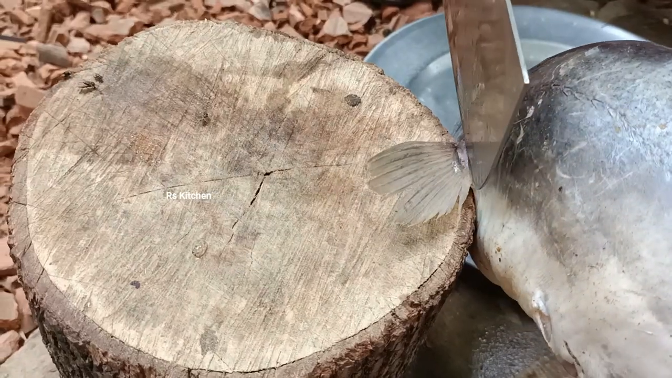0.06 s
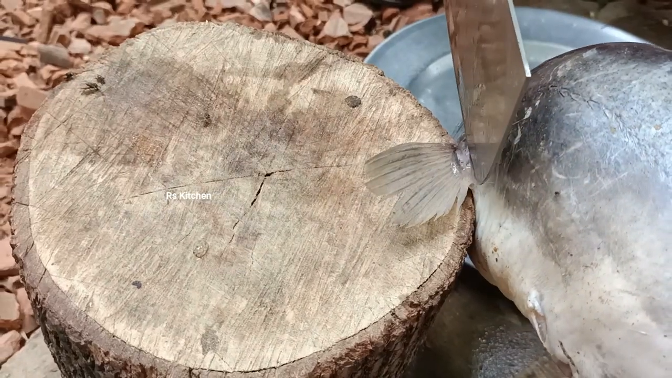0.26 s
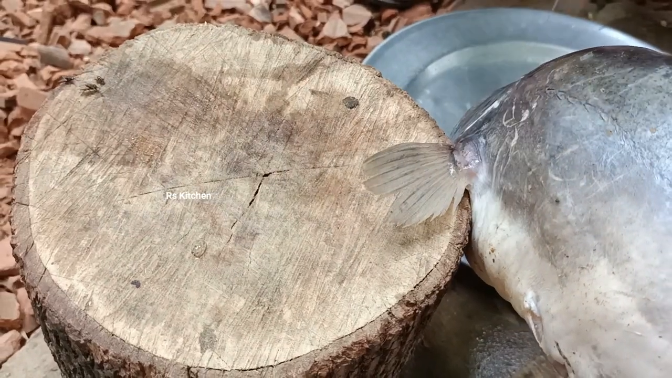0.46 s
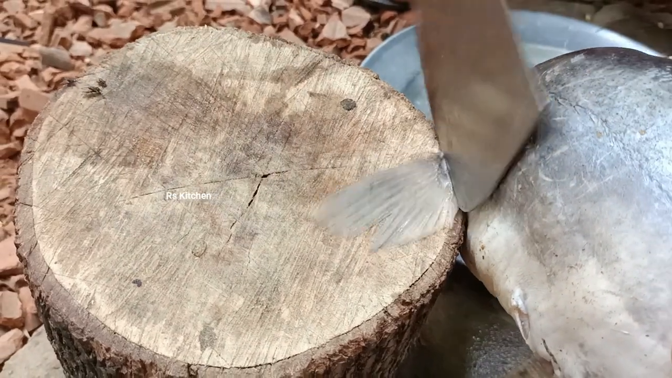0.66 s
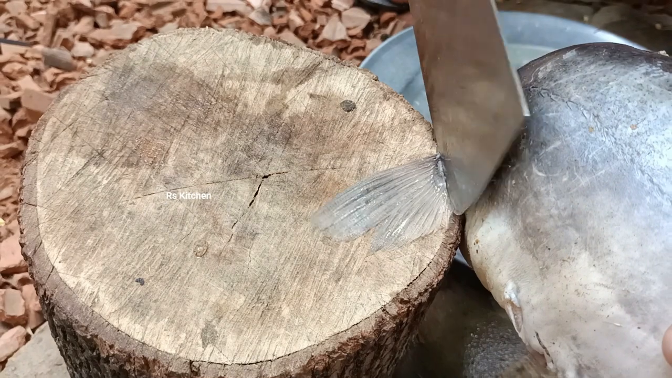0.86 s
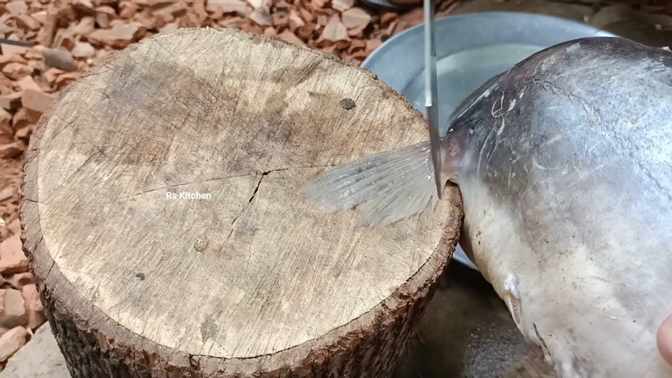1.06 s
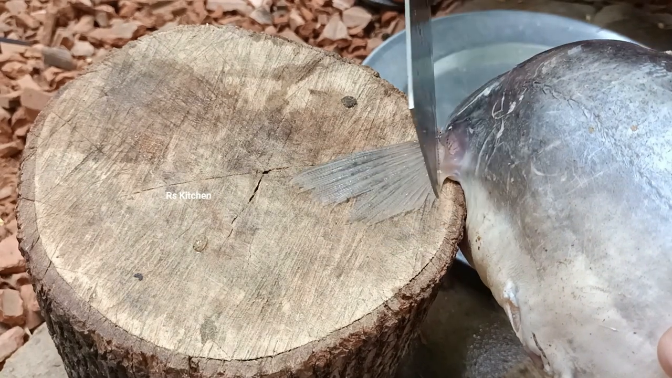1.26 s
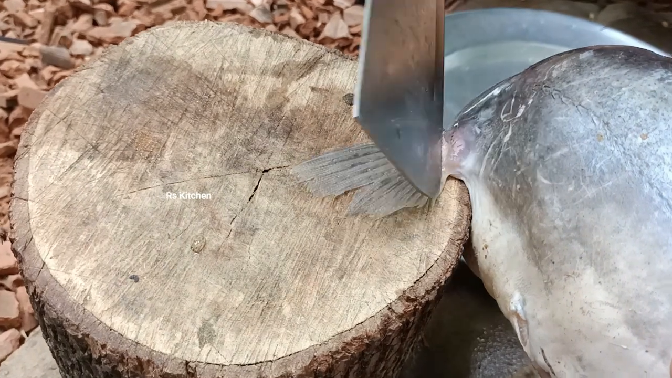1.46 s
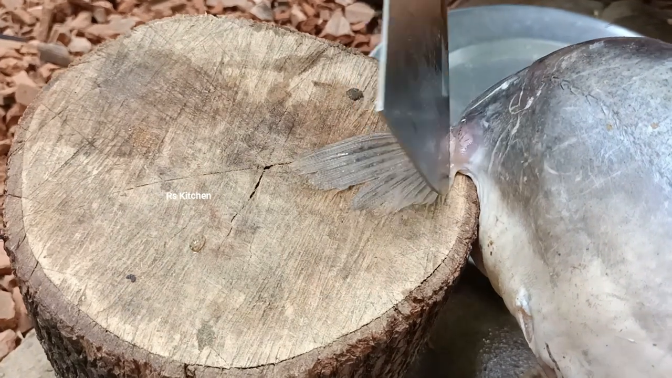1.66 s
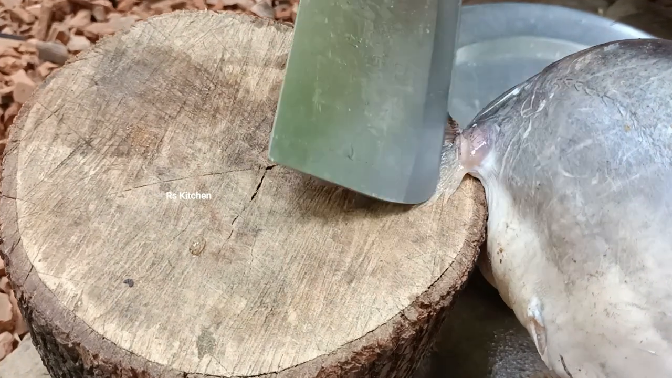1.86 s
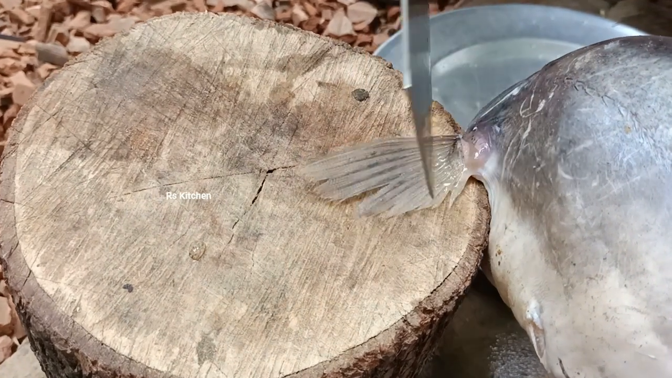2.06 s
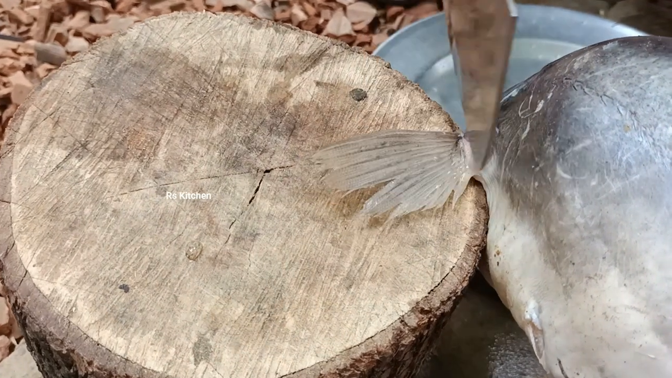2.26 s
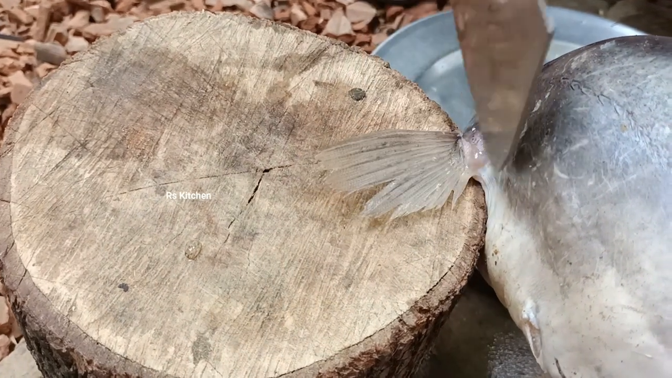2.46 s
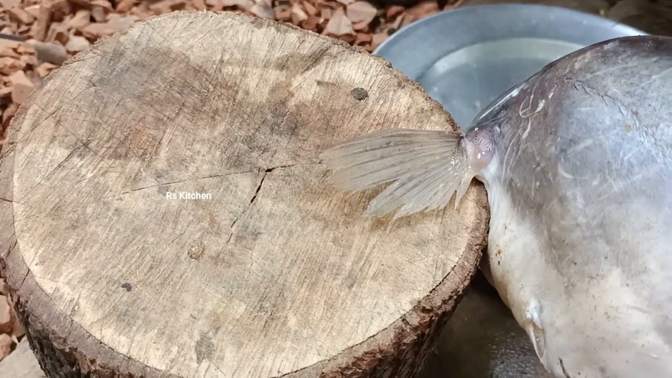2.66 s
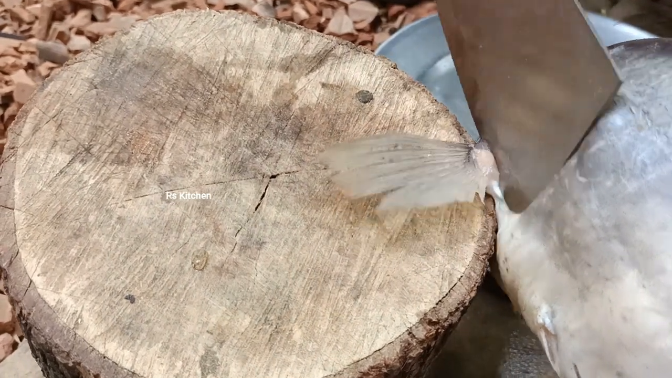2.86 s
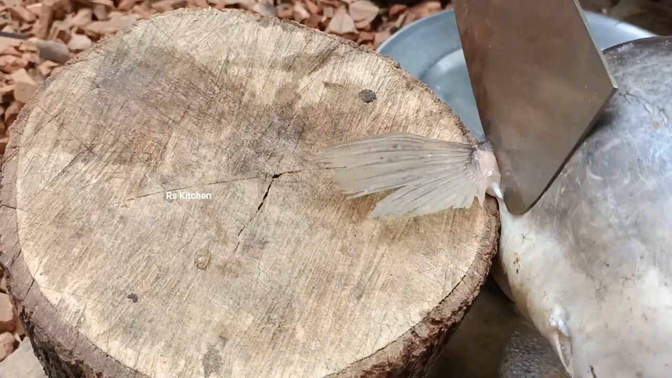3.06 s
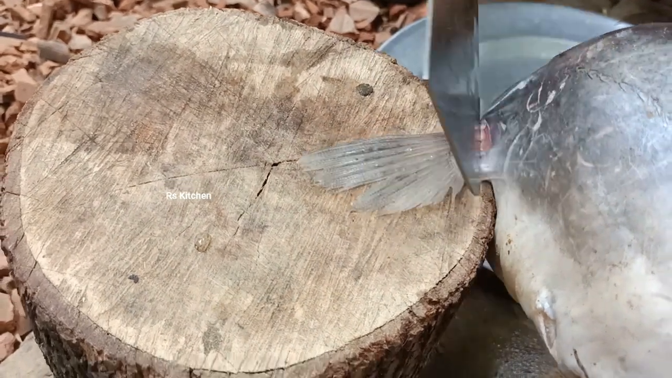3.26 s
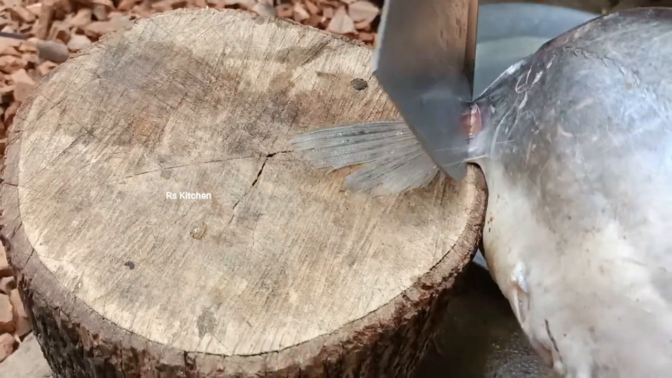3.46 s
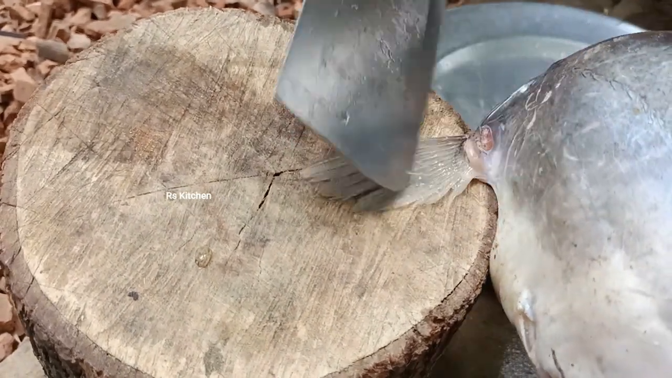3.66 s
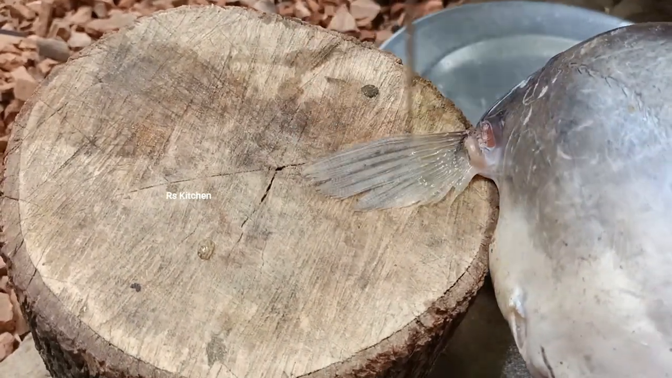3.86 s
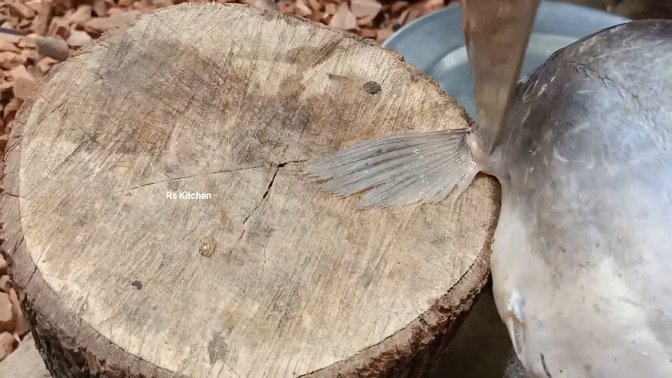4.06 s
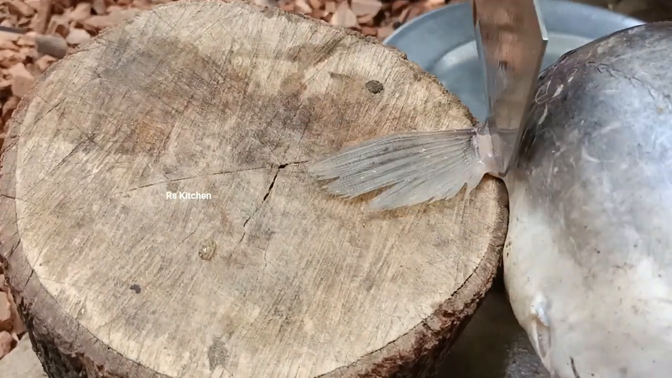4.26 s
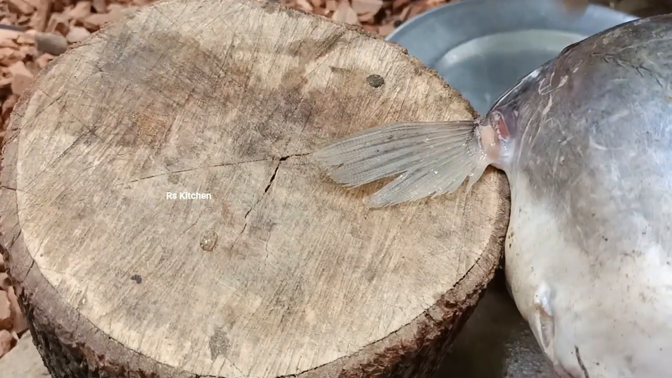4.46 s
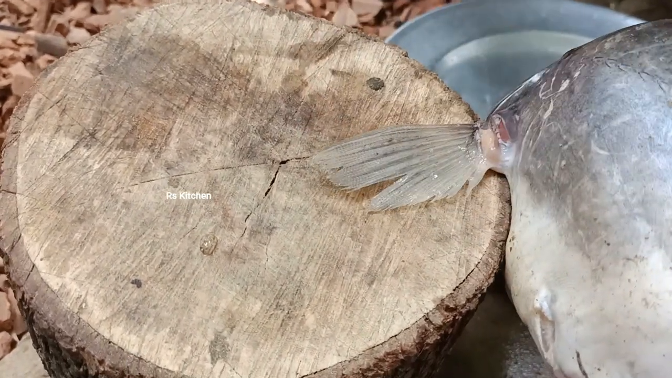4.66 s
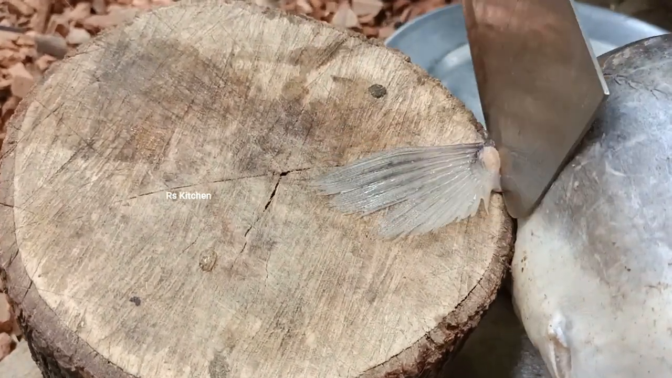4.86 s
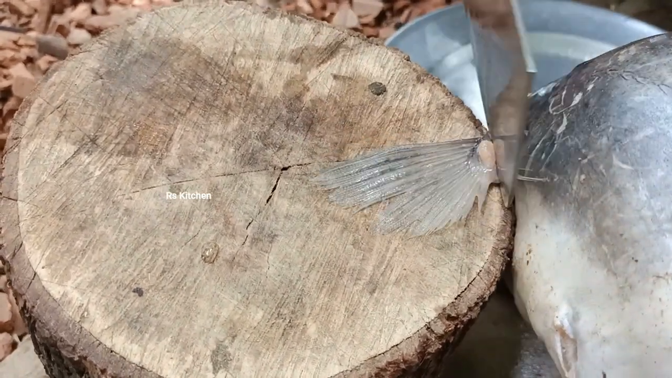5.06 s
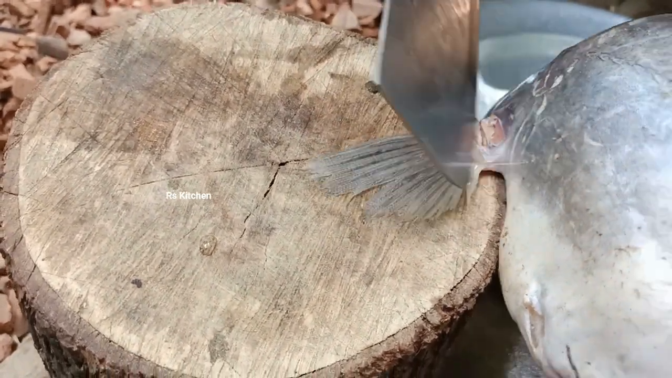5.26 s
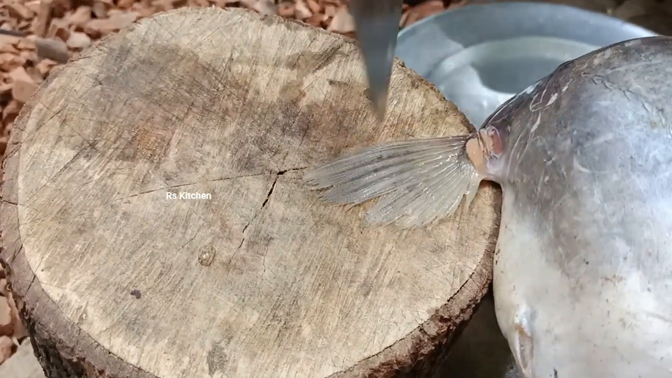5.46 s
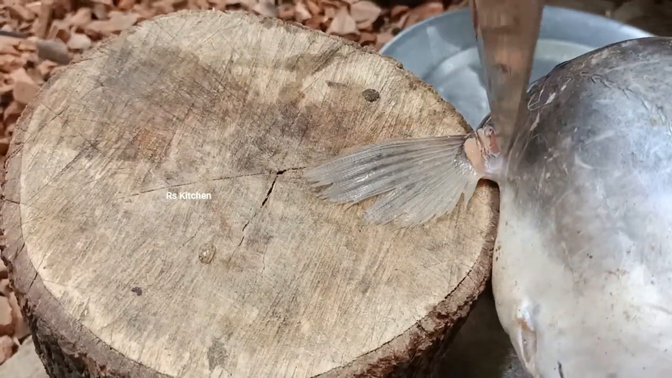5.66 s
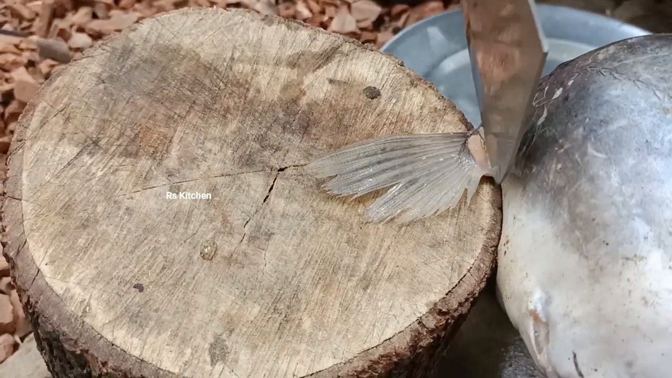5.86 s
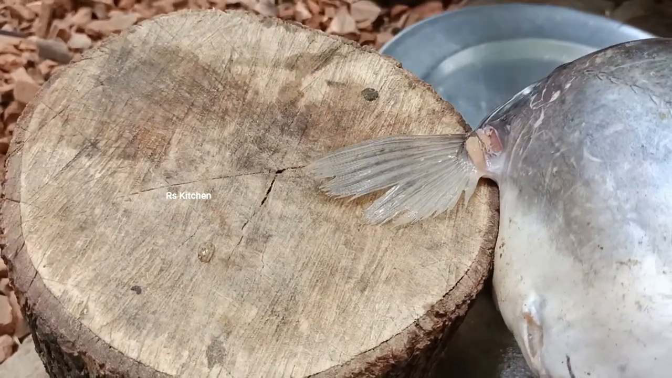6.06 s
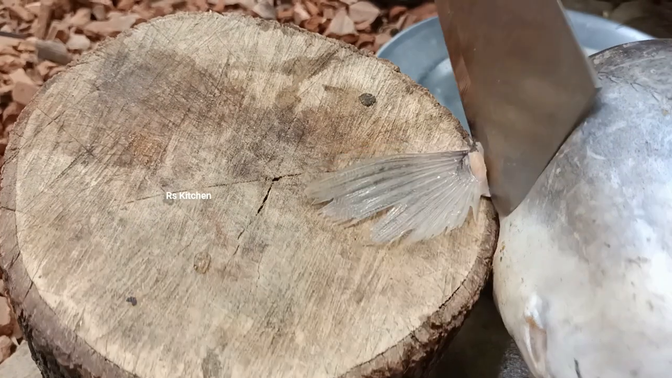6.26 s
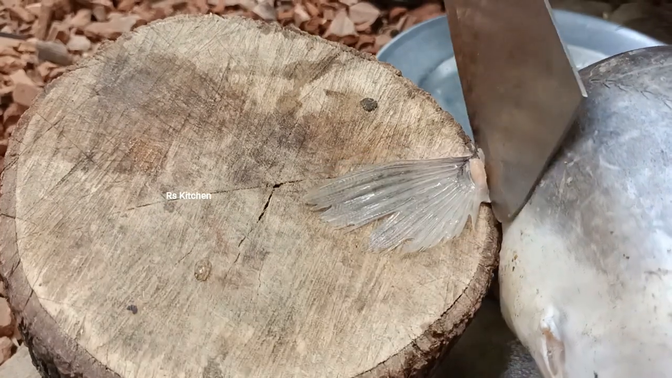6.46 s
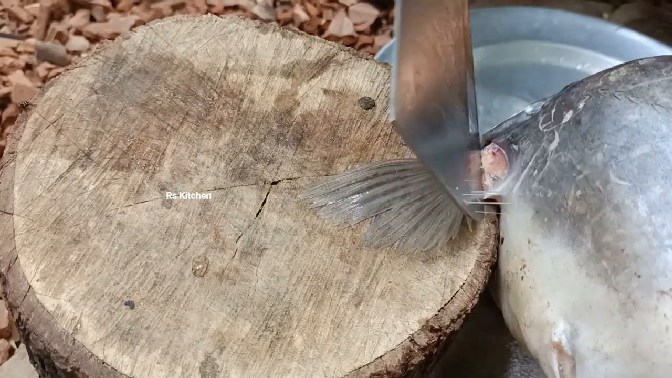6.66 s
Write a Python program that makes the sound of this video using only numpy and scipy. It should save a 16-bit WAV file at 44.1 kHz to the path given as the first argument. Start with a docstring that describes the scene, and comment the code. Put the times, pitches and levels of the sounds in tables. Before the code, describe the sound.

Close up outdoors, a cleaver chops four times, about two seconds apart at first and then a little quicker. Each blow is a bright crack of fin bone with a brief crunch and a short, damped thud of the wooden block. Between blows the blade ticks, rings briefly and scrapes on the wood. Behind it are faint birds, soft wind on the stereo microphone and a low hush.

```python
"""A cleaver chops four times through the fin of a large fish on a tree-stump block, outdoors, close by.
Each chop is shaped noise for the cracking bones, decaying sines for the block and a slow push of air.
Between chops the blade ticks and rings (noise burst, decaying sines) and scrapes (uneven noise).
Behind lie gliding bird notes, low-frequency wind noise on the microphone and a hush of filtered noise."""
import sys
import numpy as np
from scipy import signal
from scipy.fft import rfft, irfft
from scipy.io import wavfile
from scipy.ndimage import uniform_filter1d

SR = 44100
rng = np.random.default_rng(int(sys.argv[2]) if len(sys.argv) > 2 else 0)


def put_to_file(sound):
    """Save the sound as 16-bit audio at rate SR, in the file named by the first command-line argument."""
    columns = np.atleast_2d(sound).T  # one column per channel
    safe = np.clip(columns, -1, 1)
    whole_steps = np.round(safe * 32767)
    wavfile.write(sys.argv[1], SR, whole_steps.astype(np.int16))


N = 296352

# chops: (time [s], crack level [dB], crack length [s], crack colour 1 [Hz], crack colour 2 [Hz],
#   crack body [dB], thud level [dB], thud pitch [factor], thud length [factor],
#   thud tilt [dB/octave], air push [dB], pan [dB L-R])
CHOPS = [(0.7875, -11.5, 0.0032, 4460, 8220, -4.5, -16.5, 1.034, 0.53, 3.7, -12.5, -1),
         (2.9197, -14.5, 0.00442, 4330, 8940, 4, -13, 1.076, 0.64, 3.1, -48, -2),
         (4.8038, -11, 0.00234, 5600, 8530, 3, -14.5, 0.997, 0.82, 2.1, -48, 0.49),
         (6.318, -12, 0.0041, 3360, 8750, -1, -15.5, 0.947, 0.6, 3.2, -44, -1.9)]
# fin bones breaking: (frequency [Hz], relative density [dB per Hz])
CRACK_SPECTRUM = [(30, -45), (120, -21), (450, 1.5), (900, 2.5), (1700, -0.5), (3300, 2), (5500, 2.5),
                  (8500, 2), (9800, -3.5), (12000, 3.5), (15000, -6.5), (16300, 0)]
# block modes with the fish on it, before each blow's factors: (frequency [Hz], level [dB], ring time [s])
BLOCK_MODES = [(133, -21, 0.072), (178.2, -1, 0.054), (223, -15, 0.089), (376, -7, 0.04), (451, -6, 0.023),
               (542, -20, 0.053), (673, -29.5, 0.08)]


def chops(peak_db=7, slice_db=-21, slice_s=0.011):
    """The edge cracks through the bones, then thuds into the block and pushes air at the microphone."""
    out, t = np.zeros((2, N)), np.arange(SR // 4) / SR
    # the block is too small to send out deep bass
    radiation = signal.butter(3, 85, "high", fs=SR, output="sos")
    for (s, crack_db, crack_s, low_hz, high_hz, body_db,
         thud_db, pitch, hold, tilt_db, push_db, pan_db) in CHOPS:

        def bone_db(hz):
            return read(CRACK_SPECTRUM, hz) + body_db * bump(hz, 900, 640)

        def crack_shape_db(hz):
            return bone_db(hz) + peak_db * (bump(hz, low_hz, 380) + bump(hz, high_hz, 360))

        crack = burst(crack_s, fall_s=0.0005, linger_db=-11, linger_t60=0.067)
        add(out, s, amp(crack_db) * sides(pan_db) * colour(crack, crack_shape_db))

        # small bones go on snapping unevenly until the blade comes to rest
        crunch = burst(slice_s, fall_s=0.0015, linger_db=5, linger_t60=0.14, knock_db=-13)
        unevenness = evened(uniform_filter1d(rng.standard_normal(crunch.shape[1]), 40))
        crunch = crunch * amp(3 * unevenness)
        add(out, s + 0.0022, amp(crack_db + slice_db) * colour(crunch, bone_db))

        # a faint crackle leads into each crack
        lead_in = burst(0.0079, fall_s=0.0012, linger_db=-32.5, linger_t60=.03)
        add(out, s - .0045, amp(crack_db - 25) * colour(lead_in, crack_shape_db))

        # the buried blade and the fish smother the block: its ring dies faster and faster
        thud = 0
        for hz, db, ring_s in BLOCK_MODES:
            mode_db = db + tilt_db * np.log2(hz / BLOCK_MODES[1][0])
            decay_db = -60 * (t / (ring_s * hold)) ** 2.87
            thud = thud + amp(mode_db + decay_db) * np.sin(2 * np.pi * hz * pitch * t)
        sink = 1 - 0.46 * np.exp(-t / 0.0028)  # the push builds as the edge sinks in
        add(out, s + 0.00234, amp(thud_db) * signal.sosfilt(radiation, sink * thud))

        # air pushed out, then drawn back
        u = t / .0115
        push = 2 * u * (1 - u / 1.5) * np.exp(-u * 1.3)
        add(out, s + .005, amp(push_db) * sides(-7) * push)
    return out


def burst(length_s, fall_s, linger_db, linger_t60, knock_db=0, crossover_hz=1400):
    """A clean knock and a few milliseconds of tiny fractures, then a dying crackle."""
    t = np.arange(SR // 5) / SR
    head = np.minimum(t / (length_s * .25), 1) * np.exp(-np.maximum(t - length_s, 0) / fall_s)
    tail = np.minimum(t / length_s, 1) * amp(linger_db - 60 * t / linger_t60)
    shared, left, right = rng.standard_normal((3, len(t)))
    # the right port hears it first
    late_left = np.roll(shared, round(SR * .00011))
    grit = evened(np.array([late_left, shared]) + 1.66 * np.array([left, right]))
    # at long wavelengths the fractures merge into one push
    knock = np.linalg.norm(head) * signal.unit_impulse(len(t), int(length_s * SR / 2))

    def band(x, kind):
        return signal.sosfilt(signal.butter(3, crossover_hz, kind, fs=SR, output="sos"), x)

    return band(head * grit, "high") + amp(knock_db) * band(knock, "low") + tail * grit


# blade touches wood: (time [s], tick level [dB], tick body [dB], ring level [dB])
TAPS = [(1.8514, -25, 6, -35.5), (1.931, -44, -19, -59), (3.583, -41, -14, -68), (3.594, -40, -17, -68),
        (3.618, -22.5, -20, -59), (3.627, -33, -11, -62), (3.6769, -25.5, 5, -25), (3.7364, -33.5, 2, -38),
        (5.3663, -26.5, -5, -34.5), (5.909, -50, 8, -73)]
TAP_PAN_DB = 0.5  # L-R, tick only


def taps():
    """Each touch is a gritty tick of edge on wood and a short ring of steel."""
    out = np.zeros((2, N))
    for s, tick_db, body_db, ring_db in TAPS:
        add(out, s, amp(tick_db) * sides(TAP_PAN_DB) * tick(body_db))
        add(out, s, amp(ring_db) * blade_ring())
    return out


# steel on wood: (frequency [Hz], relative density [dB per Hz])
TICK_SPECTRUM = [(150, -11), (700, -7.5), (1500, 0), (3000, 4.5), (5200, 2), (7500, -2.5), (9200, 0),
                 (12400, 5.5), (15000, -2), (16300, 3.5)]
TAP_S = 0.00282


def tick(body_db, pressed_share=0.3):
    """A burst of tiny steel-on-wood impacts, coloured in part by the pressed blade."""
    def shape_db(hz):
        body = body_db * bump(hz, 570, 2900)
        return read(TICK_SPECTRUM, hz) + body + pressed_share * pressed_db(hz)

    return colour(burst(TAP_S, fall_s=0.002, linger_db=-5, linger_t60=0.09), shape_db)


# steel blade modes: (frequency [Hz], level [dB], t60 [s], pan [dB L-R])
BLADE_MODES = [(2060, -8.5, 0.053, 3), (2650, -26, 0.31, 10), (3807, -7, 0.15, 22.5),
               (5080, -10, 0.077, -5), (5580, -8, 0.024, -28), (6640, -18, 0.049, -11),
               (7900, -17.5, 0.088, -17), (8900, -12, 0.045, -23), (11000, -23, .04, -2),
               (13000, -10, 0.036, -15), (13400, -17, 0.042, -2), (14010, -27, .045, -6)]


def blade_ring():
    """The blade's modes start together at random phases and die away, each at its own rate."""
    t = np.arange(SR // 4) / SR
    ring = 0
    for (hz, db, t60, pan_db), turn in zip(BLADE_MODES, rng.random(len(BLADE_MODES))):
        ring = ring + sides(pan_db) * amp(db - 60 * t / t60) * np.sin(2 * np.pi * (hz * t + turn))
    return ring * np.minimum(t / 0.00064, 1)


# blade drags the fin across the block: (start [s], length [s], level [dB], strongest snag [dB])
SCRAPES = [(1.952, 0.073, -45, -52), (3.75, 0.11, -38.5, -41.5), (4.06, .19, -53.5, -64),
           (5.195, 0.077, -55, -49)]
# scrape: (frequency [Hz], relative density [dB per Hz])
RASP_SPECTRUM = [(300, -12), (1400, -14), (3300, -0.5), (4200, -3), (5400, 0), (9500, -5.5), (13000, 1.5),
                 (16000, -8)]
SCRAPE_RISE, SCRAPE_RELEASE = .14, .28  # shares of the stroke
SCRAPE_SAG_DB = -7  # pressure eases over the stroke
SNAGS_PER_S = 46


def scrapes(catch_db=2.0, knock_db=-37, snag_body_db=-14, snag_spread_db=5):
    """The edge slips over the grain and sounds the pressed blade; at times it snags with a tick."""
    out = np.zeros((2, N))

    def shape_db(hz):
        return read(RASP_SPECTRUM, hz) + pressed_db(hz)

    for s, length_s, db, snag_db in SCRAPES:
        u = np.linspace(0, 1, int(length_s * SR))
        stroke = np.minimum(np.minimum(u / SCRAPE_RISE, (1 - u) / SCRAPE_RELEASE), 1)
        pressure = stroke * amp(SCRAPE_SAG_DB * u)
        catches = amp(catch_db * evened(uniform_filter1d(rng.standard_normal(SR), 70)))
        slips = (rng.standard_normal((2, SR)) * catches)[:, :len(u)]
        add(out, s, amp(db) * pressure * evened(colour(slips, shape_db)))
        # one snag at a random moment of each slot
        for k, (late, weak) in enumerate(rng.random(size=(20, 2))):
            wait_s = (k + late) / SNAGS_PER_S
            if wait_s < length_s:
                add(out, s + wait_s, amp(snag_db - snag_spread_db * weak) * tick(snag_body_db))

    # the flat of the blade nudges the block as the loudest scrape starts
    t = np.arange(SR // 8) / SR
    knock = sum(amp(db - 60 * (t / ring_s) ** 2) * np.sin(2 * np.pi * hz * 1.14 * t)
                for hz, db, ring_s in BLOCK_MODES)
    add(out, 3.740, amp(knock_db) * np.minimum(t / 0.0032, 1) * knock)
    return out


# blade resonances while pressed on wood: (frequency [Hz], width [Hz], height [dB])
PRESSED_MODES = [(2750, 140, -2), (5350, 170, 10), (6230, 290, 10.5), (7730, 180, 12), (8700, 320, 11),
                 (12100, 500, 8.5)]


def pressed_db(hz):
    """The colour that the pressed blade's resonances give to whatever rubs it."""
    return sum(db * bump(hz, centre_hz, width_hz) for centre_hz, width_hz, db in PRESSED_MODES)


# yard echo, before the stretch factor: (frequency [Hz], t60 [s])
YARD_DECAY = [(150, 0.37), (500, 0.25), (1500, 0.27), (4000, 0.19), (9000, 0.19), (15000, 0.035)]


def yard(x, stretch=0.88):
    """Sparse reflections of random sign, each band dying at its own speed."""
    echoes = rng.choice([-1., 1.], (2, SR)) * (rng.random((2, SR)) < .12)
    echoes[:, :SR // 200] = 0
    hz, t, z = signal.stft(echoes, SR, nperseg=256)
    same = np.clip(read(LIKENESS, hz), 0, 1)[:, None]
    z[1] = same * z[0] + np.sqrt(1 - same ** 2) * z[1]
    t60 = stretch * read(YARD_DECAY, hz)[:, None]
    tail = signal.istft(z * amp(-60 * t / t60), SR, nperseg=256)[1]
    return signal.fftconvolve(x, tail / np.linalg.norm(tail[0]), axes=1)[:, :N]


# nearest calls: (time [s], length [s], start pitch [Hz], glide [factor], relative level [dB])
BIRDS = [(2.124, 0.038, 1013, 1.078, -45), (2.465, 0.04, 3480, .945, -53.5), (3.426, .034, 3210, 1, -55),
         (4.42, .048, 2580, 0.95, -55), (4.517, 0.011, 1000, 1.06, -50.5), (4.919, 0.12, 2690, 0.9, -52.5)]
# farther flock; relative level as for the near calls
FLOCK_PER_S, FLOCK_HZ, FLOCK_SPREAD_OCTAVES = 3.3, 3090, .13
FLOCK_S, FLOCK_GLIDE, FLOCK_DB = .04, .96, -65  # lengths spread from half to one and a half FLOCK_S


def birds(echo_db=-6, direct_db=-3, pan_db=4.9):
    """A few near calls and a flock of faint ones, blurred by the yard's reflections."""
    out = np.zeros((2, N))
    for s, length_s, pitch_hz, glide, db in BIRDS:
        add(out, s, amp(db) * chirp(length_s, pitch_hz, glide))
    # one call at a random moment of each slot
    for k, (late, high, long) in enumerate(rng.random(size=(40, 3))):
        pitch_hz = FLOCK_HZ * 2 ** (FLOCK_SPREAD_OCTAVES * (2 * high - 1))
        call = chirp(FLOCK_S * (.5 + long), pitch_hz, FLOCK_GLIDE)
        add(out, (k + late) / FLOCK_PER_S, amp(FLOCK_DB) * call)
    out = sides(pan_db) * out
    return amp(direct_db) * out + amp(echo_db) * yard(out)


VOICE_TOP_HZ, VOICE_SLOPE_DB = 1630, -18  # overtones fade above this pitch, per octave


def chirp(length_s, pitch_hz, glide, waver_share=0.023):
    """One gliding, wavering note; high notes waver more and are nearly pure."""
    t = np.arange(0, length_s, 1 / SR)
    wobble = evened(uniform_filter1d(rng.standard_normal(SR // 4), 100))[:len(t)]
    waver = waver_share * pitch_hz / FLOCK_HZ * wobble
    turns = np.cumsum(pitch_hz * glide ** (t / length_s) * (1 + waver)) / SR
    call = 0
    for k in range(1, 4):
        octaves_above = np.log2(max(k * pitch_hz / max(VOICE_TOP_HZ, pitch_hz), 1))
        call = call + amp(VOICE_SLOPE_DB * octaves_above) * np.sin(2 * np.pi * k * turns)
    return call * np.sin(np.pi * t / length_s)


# strongest puffs on the microphone: (start [s], length [s], level [dB], pan [dB L-R])
PUFFS = [(0.34, .13, -40.5, 13.5), (0.764, 0.071, -25.5, -3), (2.03, 0.18, -52, -12),
         (5.889, 0.064, -48, 26), (6.08, 0.19, -50.5, -19.5)]
# puff: (frequency [Hz], relative density [dB per Hz])
WIND_SPECTRUM = [(15, -3), (50, 7.5), (95, -2), (170, -14.5), (400, -26), (1500, -65)]
# breeze that swells and dies, before flutter: (middle [s], half width [s], level [dB], pan [dB L-R])
BREEZE = [(.2, 0.45, -52, -4), (1.45, 0.45, -61, 8), (6.05, 0.38, -61.5, 14)]
BUFFETS_PER_S, BUFFET_DB = 11, 4  # speed and depth of the flutter


def wind():
    """A fluttering breeze and a few low puffs strike the two ports unevenly."""
    puffs, t = np.zeros((2, N)), np.arange(N) / SR
    eddies = rng.standard_normal((2, N))
    eddies = eddies + 0.24 * eddies[::-1]  # partly shared by the ports
    eddies = evened(colour(eddies, lambda hz: read(WIND_SPECTRUM, hz)))
    flutter = np.array([np.interp(t * BUFFETS_PER_S, np.arange(len(port)), port)
                        for port in rng.standard_normal(size=(2, 200))])
    for s, length_s, db, pan_db in PUFFS:
        add(puffs, s, amp(db) * sides(pan_db) * np.hanning(int(length_s * SR)))
    breeze = sum(amp(db) * sides(pan_db) * np.exp(-((t - s) / width_s) ** 2)
                 for s, width_s, db, pan_db in BREEZE)
    return np.hypot(puffs, breeze * amp(BUFFET_DB * flutter)) * eddies


# outdoor hush: (frequency [Hz], relative density [dB per Hz])
HUSH_SPECTRUM = [(15, -44), (25, -9.5), (49, -5.5), (108, -10.5), (175, 1), (301, -6.5), (531, 1),
                 (818, -10), (1370, -8.5), (1560, -21), (3160, -18.5), (5000, -19), (5730, -18.5),
                 (14000, -24.5), (16000, -31)]
# left-right likeness, also of the yard echo: (frequency [Hz], correlation [-1..1])
LIKENESS = [(60, 0.75), (130, 1), (290, 0.78), (640, 0.69), (1400, 0), (16000, 0)]
# low, middle and high band at the start: (level [dB], drift [dB/s])
HUSH_BANDS = [(-55.5, 0.97), (-51.5, -0.22), (-50, .5)]
# step down at each chop, in order: (drop [dB])
HUSH_DROPS_DB = [4.25, 2.92, 2.22, 7.1]
DROP_S = 0.15


def hush(chatter_db=-65, chatter_hz=2900, chatter_patch_db=4.5):
    """Noise for rumble, murmur and hiss, and a patchy noise band for the chatter of many far birds."""
    hz, t = np.fft.rfftfreq(1024, 1 / SR), np.arange(N // 256 + 5) * 256 / SR
    a, b, c, d, patches = rng.standard_normal((len(t), len(hz), 5)).T
    patches = evened(uniform_filter1d(uniform_filter1d(patches, 7, 0), 12, 1))
    same = np.clip(read(LIKENESS, hz), -1, 1)[:, None]
    left = a + 1j * b
    right = same * left + np.sqrt(1 - same ** 2) * (c + 1j * d)
    noise = np.array([left, right])

    def play(gain):
        return evened(signal.istft(noise * gain, nperseg=1024, noverlap=768)[1][:, :N])

    shape = amp(read(HUSH_SPECTRUM, hz)[:, None] + .5 * patches)
    band = np.digitize(hz, [360, 1500])[:, None]
    s = np.arange(N) / SR
    dropped_db = sum(db * np.clip((s - chop[0]) / DROP_S, 0, 1)
                     for chop, db in zip(CHOPS, HUSH_DROPS_DB))
    levels_db = [db + drift * s - dropped_db for db, drift in HUSH_BANDS]
    air = sum(amp(db) * play(shape * (band == k)) for k, db in enumerate(levels_db))

    # 1j: a quarter turn away from the air noise
    chatter = play(1j * bump(hz[:, None], chatter_hz, 950) * amp(chatter_patch_db * patches))
    # the chatter follows the hiss level in part
    fading_db = 0.52 * (levels_db[-1] - levels_db[-1].mean())
    return sides(0.53) * air + sides(13.3) * amp(chatter_db + fading_db) * chatter


def amp(db):
    """Decibels to amplitude."""
    return 10 ** (np.asarray(db) / 20)


def evened(x):
    """Scales to rms 1."""
    return x / np.sqrt(np.mean(x ** 2) + 1e-20)


def read(points, hz):
    """Reads a table on a log-frequency axis."""
    f, value = np.transpose(points)
    return np.interp(np.log(hz + 1), np.log(f + 1), value)


def bump(hz, centre_hz, width_hz):
    """A bell of height 1 on the frequency axis."""
    return np.exp(-((hz - centre_hz) / width_hz) ** 2)


def sides(pan_db):
    """Left and right gains for a level difference L-R."""
    return amp(np.array([[.5], [-.5]]) * pan_db)


def add(mix, s, sound):
    """Adds a sound at s seconds, cut at the end of the mix."""
    part = mix[:, max(round(s * SR), 0):][:, :sound.shape[-1]]
    part += sound[..., :part.shape[1]]


def colour(x, gain_db, size=4096):
    """Causal minimum-phase filter of unit power whose dB shape is gain_db(hz)."""
    log_gain = np.log(amp(gain_db(abs(np.fft.fftfreq(size, 1 / SR)))))
    response = np.exp(np.conj(signal.hilbert(log_gain)))
    kernel = np.fft.ifft(response).real[:size // 2]
    return signal.fftconvolve(x, kernel[None] / np.linalg.norm(kernel), axes=1)[:, :x.shape[1]]


# microphone pair's lean for the chops: (frequency [Hz], level difference [dB L-R])
LEAN = [(60, -4.5), (200, 2.5), (700, -6), (1300, -3), (2400, 10), (4400, 4), (8100, -5), (12500, 0),
        (15000, 0)]


def scene(echo_db=-19):
    """The near knife work with its short echo, over the outdoor background."""
    lean = sides(read(LEAN, np.fft.rfftfreq(N, 1 / SR)))
    near = irfft(rfft(chops()) * lean, N) + taps() + scrapes()
    return near + amp(echo_db) * yard(near) + hush() + birds() + wind()


EDGE_HZ = 15900


def record(dry):
    """Rounds off the loudest peaks softly, then low-passes at the band edge."""
    rounded = dry / (1 + abs(dry / .9) ** 6) ** (1 / 6)
    lowpass = signal.firwin(255, EDGE_HZ, window=("kaiser", 9), fs=SR)
    return signal.oaconvolve(rounded, lowpass[None], "same")


dry = scene()
out = record(dry)
put_to_file(out)
```